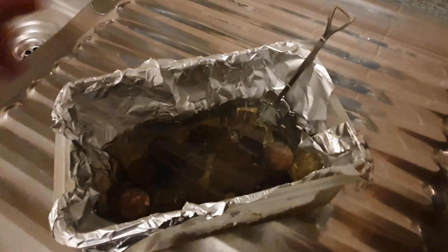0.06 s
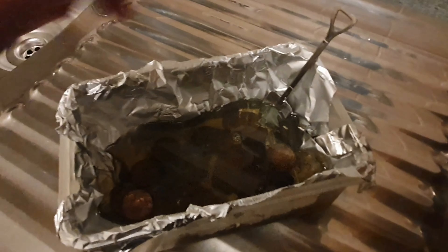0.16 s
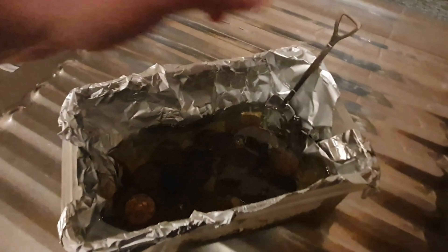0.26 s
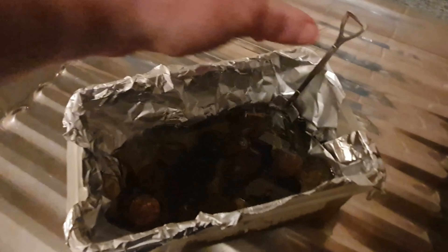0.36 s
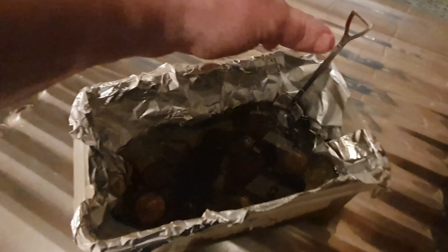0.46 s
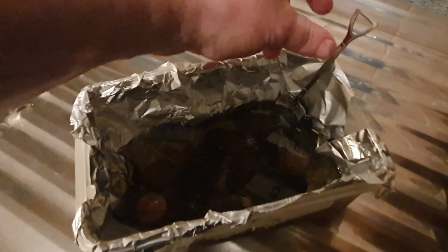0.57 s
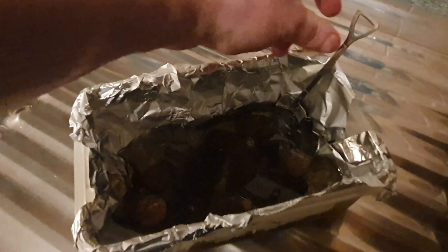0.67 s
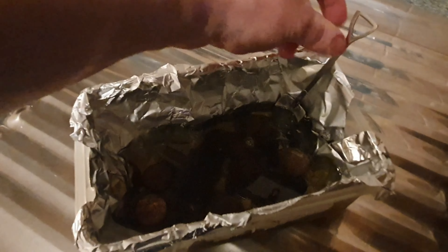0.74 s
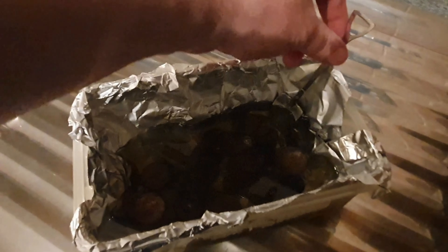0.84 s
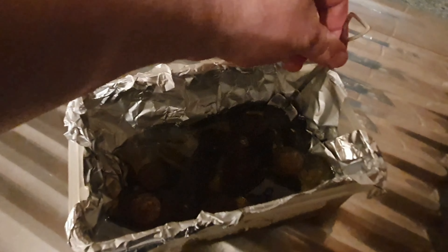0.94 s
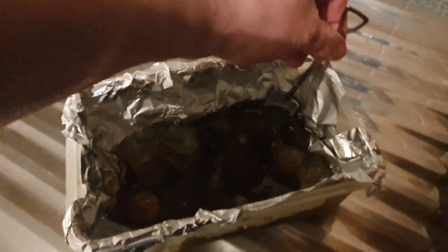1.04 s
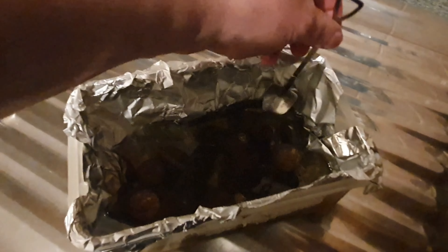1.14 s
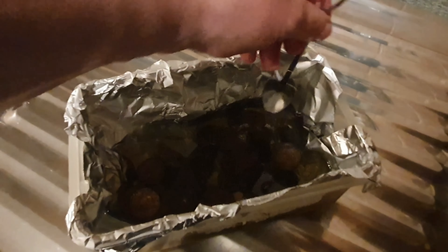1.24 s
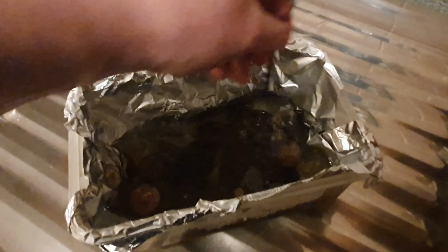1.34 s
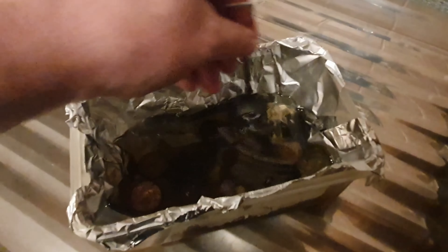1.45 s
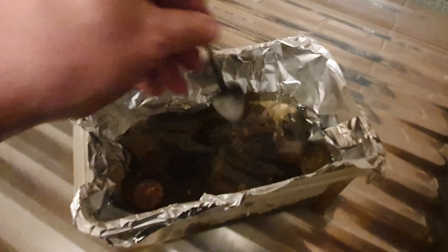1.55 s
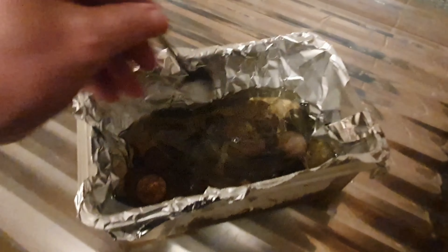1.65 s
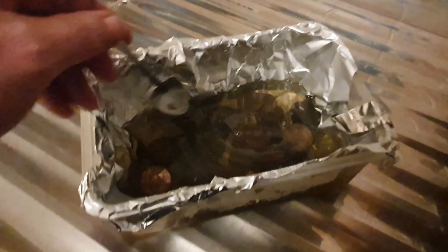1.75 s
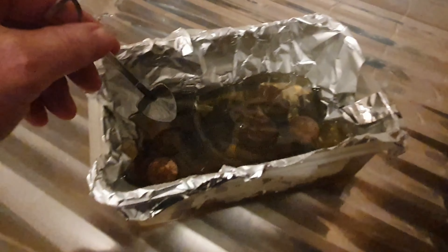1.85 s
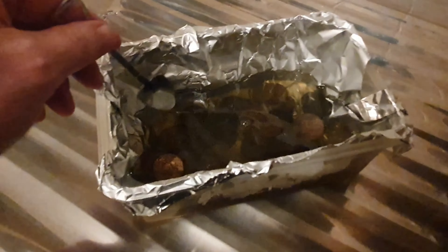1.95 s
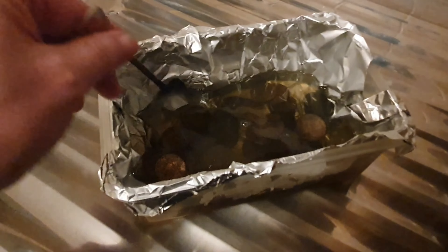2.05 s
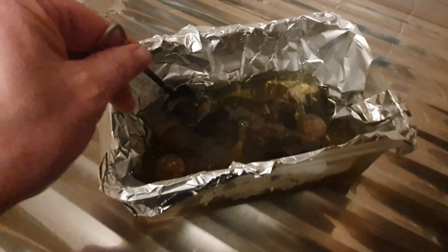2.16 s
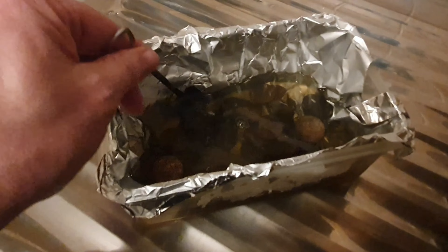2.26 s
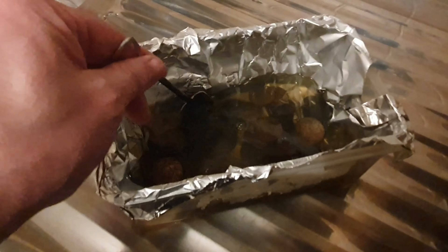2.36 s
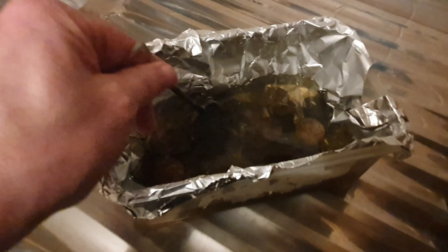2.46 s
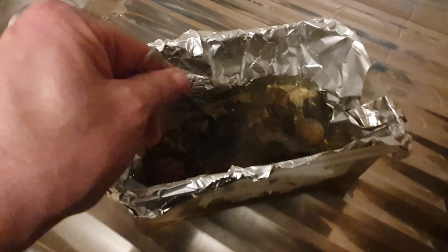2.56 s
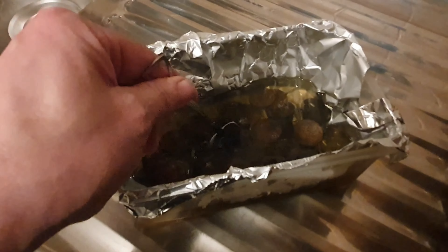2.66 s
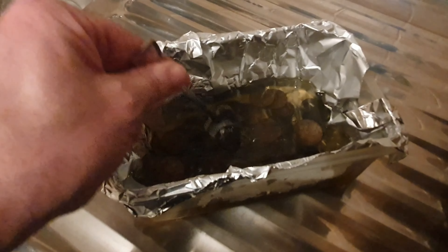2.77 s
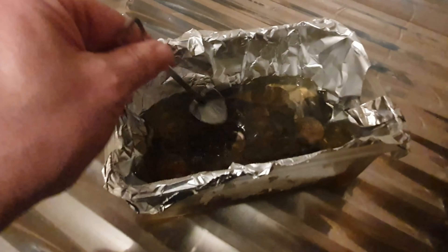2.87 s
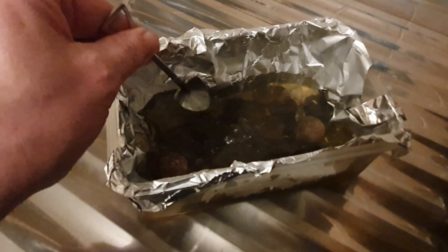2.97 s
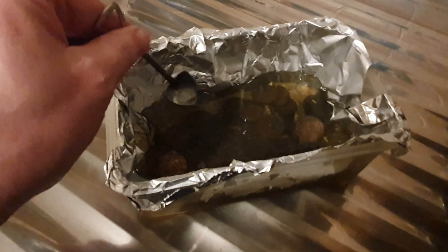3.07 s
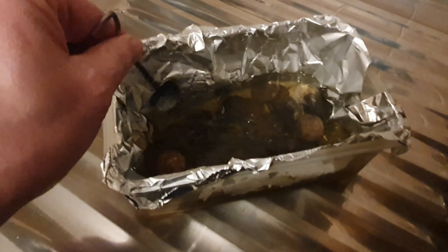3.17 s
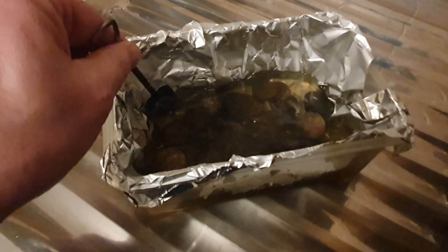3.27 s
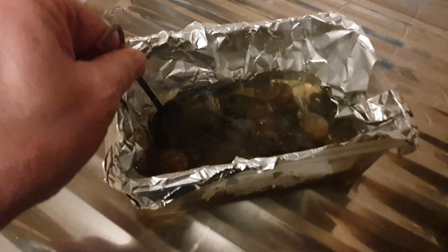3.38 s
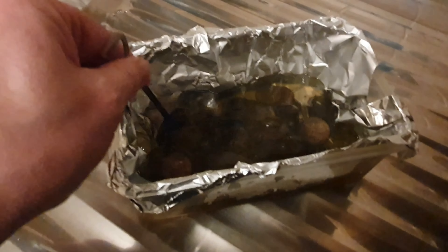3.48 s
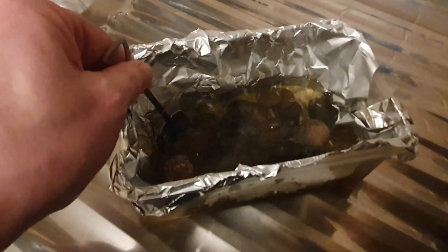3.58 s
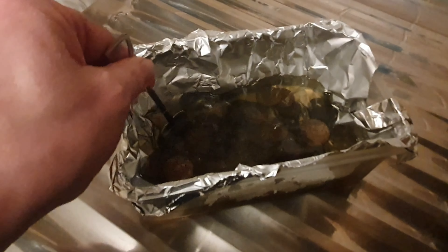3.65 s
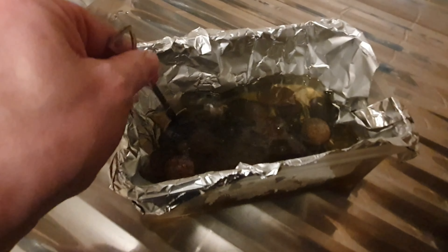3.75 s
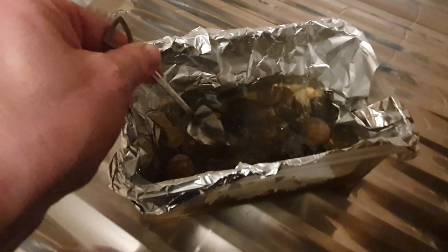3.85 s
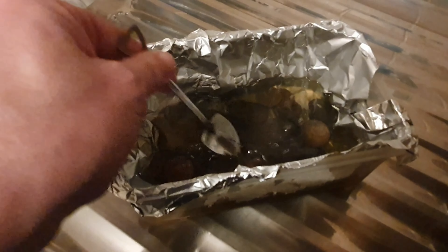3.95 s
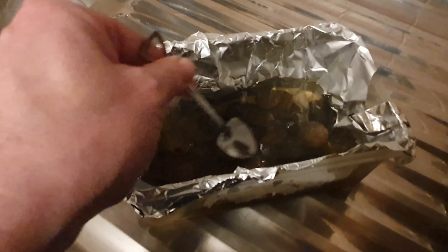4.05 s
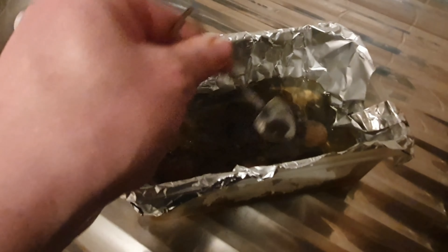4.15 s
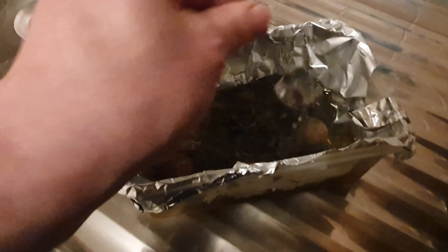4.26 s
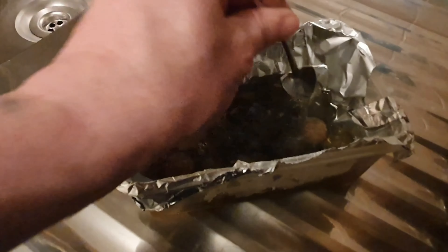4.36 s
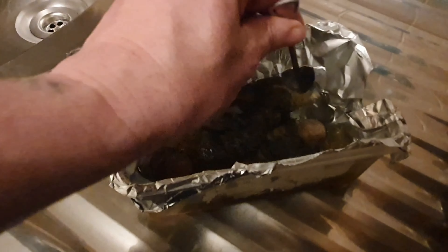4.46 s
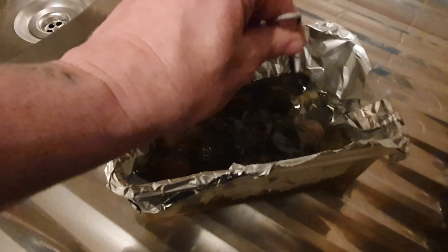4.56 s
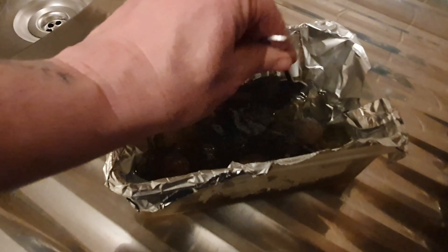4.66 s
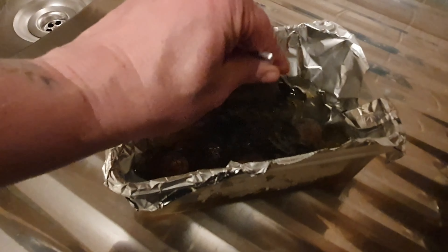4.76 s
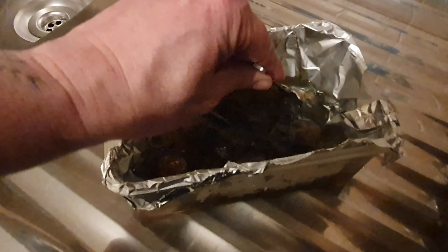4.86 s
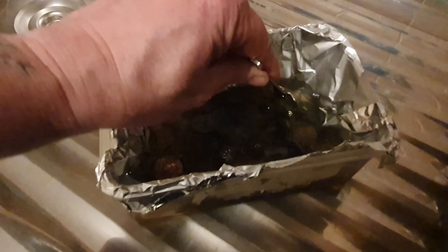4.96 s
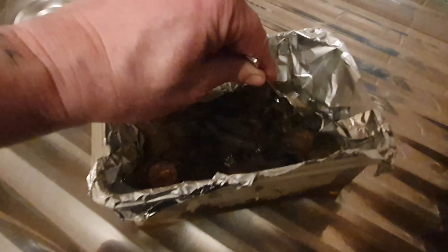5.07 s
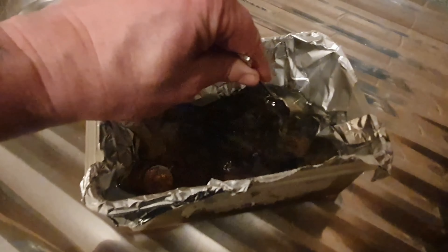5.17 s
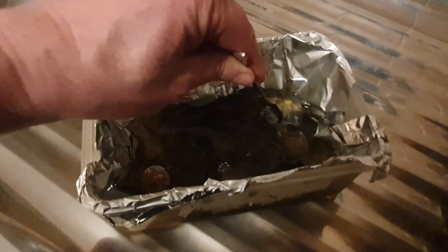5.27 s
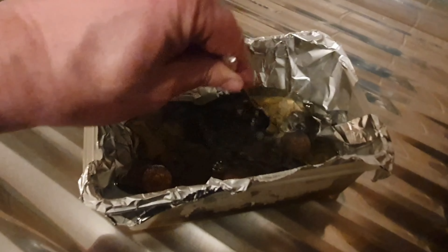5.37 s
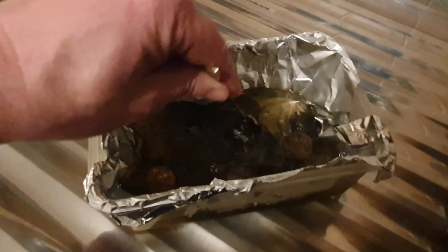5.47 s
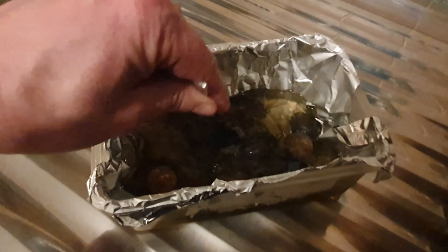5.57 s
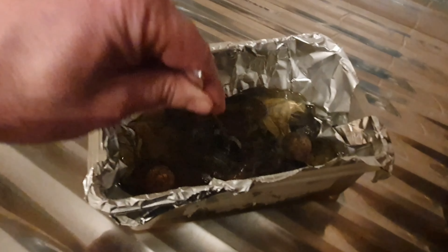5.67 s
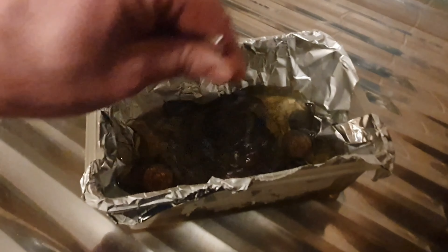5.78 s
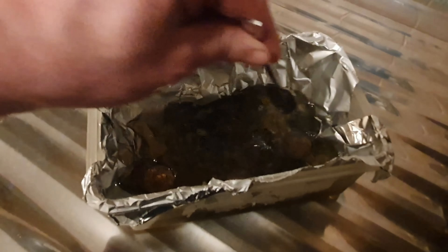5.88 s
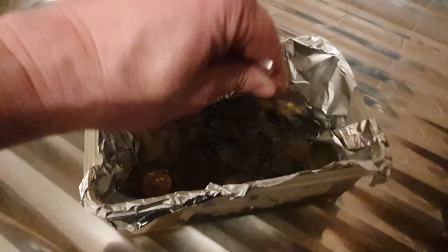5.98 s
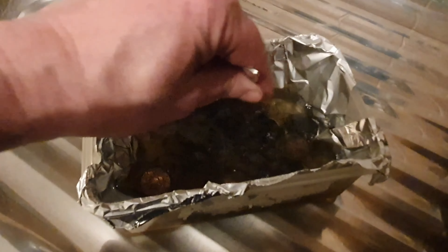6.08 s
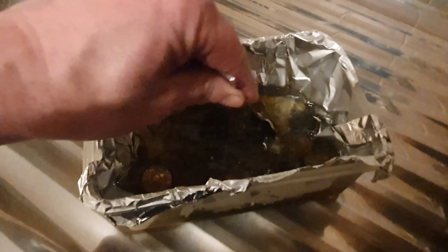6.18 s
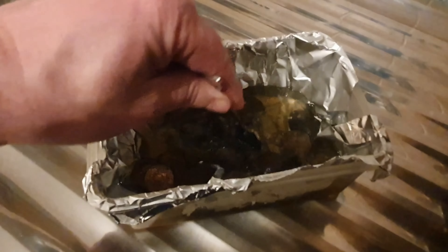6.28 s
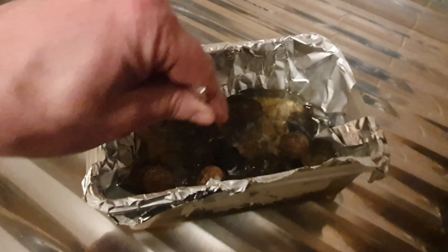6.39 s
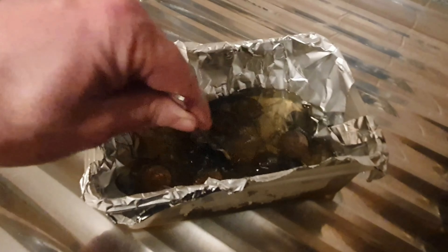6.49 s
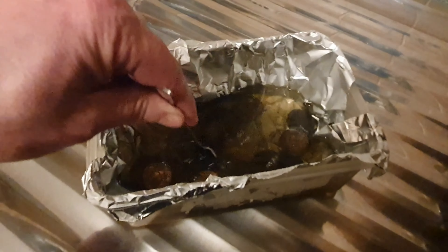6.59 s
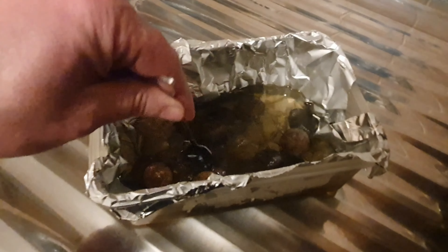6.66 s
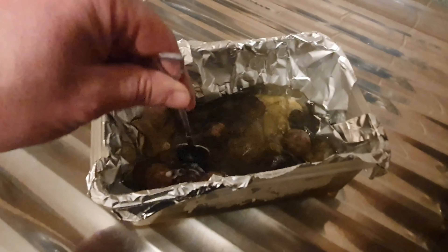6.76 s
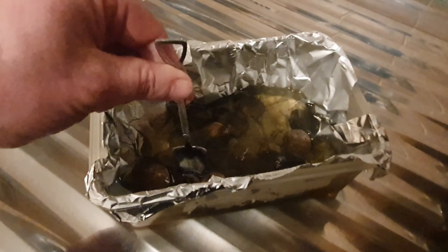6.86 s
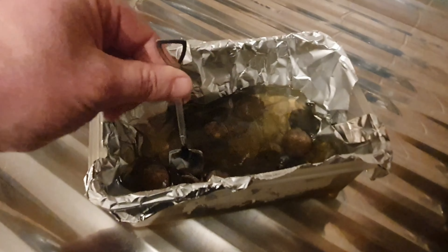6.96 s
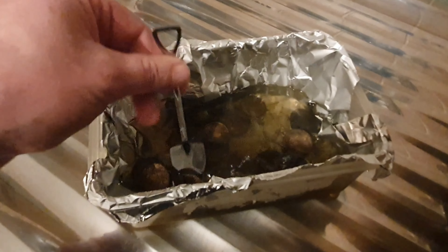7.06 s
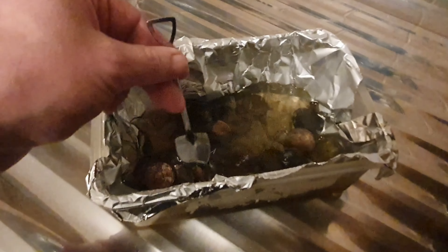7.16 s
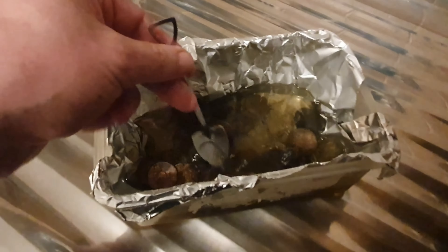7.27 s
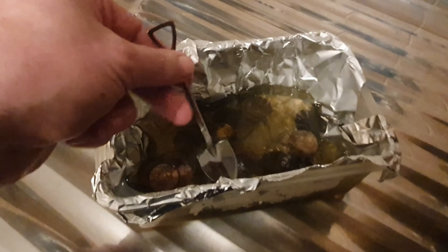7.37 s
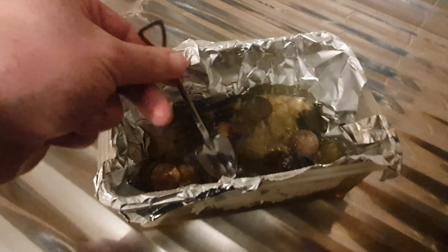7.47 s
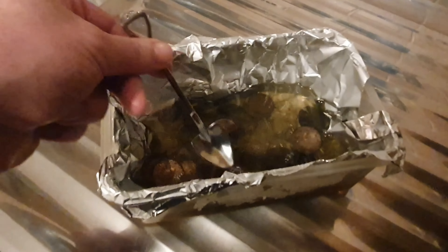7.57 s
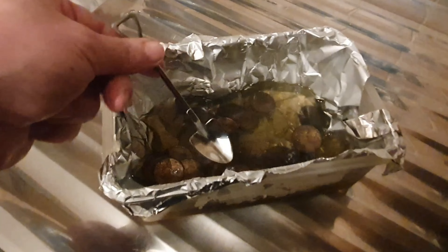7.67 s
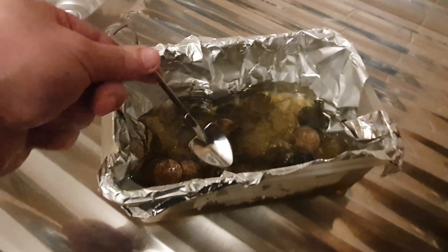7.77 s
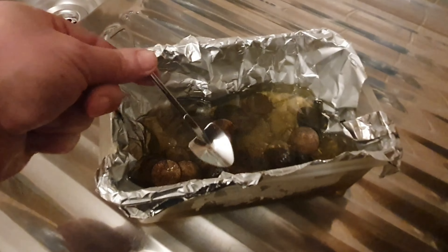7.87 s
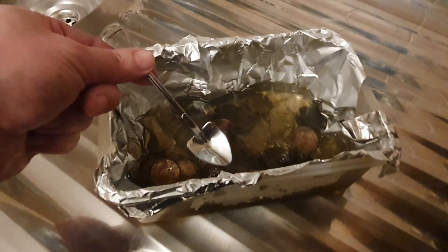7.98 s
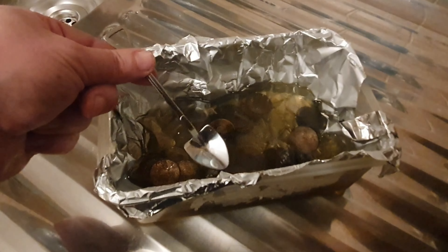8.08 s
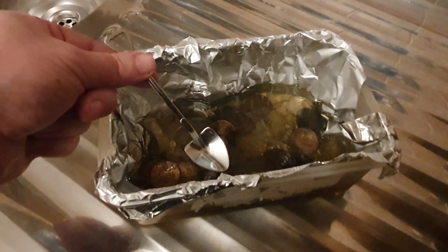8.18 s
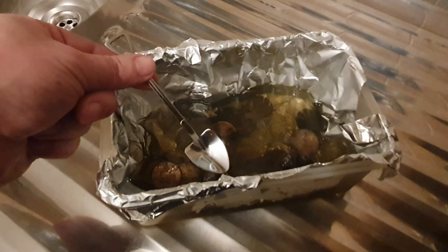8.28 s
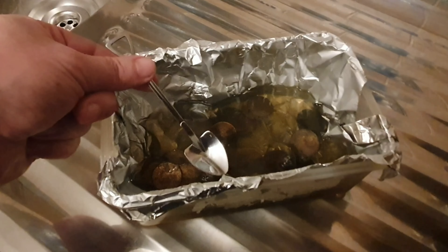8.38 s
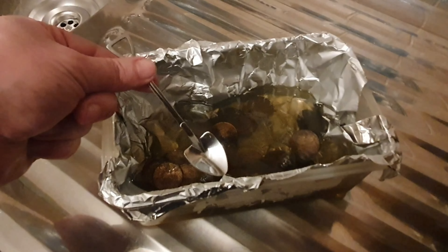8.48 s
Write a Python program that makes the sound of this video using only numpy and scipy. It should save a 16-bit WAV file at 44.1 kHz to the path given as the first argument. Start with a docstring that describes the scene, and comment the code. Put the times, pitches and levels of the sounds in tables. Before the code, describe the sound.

Bright irregular coin clinks and crinkly foil scrapes from a little spoon, with dull low thuds of a metal sink top, growing busier then stopping.

```python
"""A small metal spoon scrapes coins over the foil lining of a tray: dense random slips rustle and ring it.
Coins clink as bursts of noise with a ring and a rattle, and the hollow tray knocks in short fading notes.
The steel draining board under the tray booms and drums: pushed noise through a few low notes of its own.
A small kitchen echoes briefly; behind it lie a low house rumble with faint hiss, and a hum that comes twice."""
import sys
import numpy as np
from scipy import signal
from scipy.fft import rfft, irfft, next_fast_len
from scipy.io import wavfile
from scipy.ndimage import uniform_filter1d

SR = 44100
rng = np.random.default_rng(int(sys.argv[2]) if len(sys.argv) > 2 else 0)


def master(y):
    """Save y as 16-bit WAV."""
    cut = np.clip(np.atleast_2d(y).T, -1, 1)
    pcm = np.round(cut * 32767)  # scale
    wavfile.write(sys.argv[1], SR, pcm.astype(np.int16))


N = 376111  # samples
CONTROL_STEP = 32  # samples between the points of a slow control
LEFT_LAG = -6  # samples; the tray is nearer the left port
TOP_HZ = 16500


def undb(db):
    """Decibels to gain."""
    return 10 ** (np.asarray(db) / 20)


def unit(x):
    """Scale to an rms level of 1."""
    return x / np.sqrt(np.mean(x ** 2))


def colour(x, points):
    """Make each pitch range louder or softer, following (Hz, dB) points."""
    size = next_fast_len(N)
    hz, db = np.transpose(points)
    bins = np.arange(size // 2 + 1) * SR / size + 1
    gain = undb(np.interp(np.log(bins), np.log(hz), db))
    return irfft(rfft(x, size) * gain, size)[..., :N]


def band(x, lo_hz, hi_hz):
    """Keep the pitches between two limits."""
    return signal.sosfilt(signal.butter(2, [lo_hz, hi_hz], "band", fs=SR, output="sos"), x)


def split(x, lo_hz, hi_hz):
    """Low, middle and high part that add up to the whole."""
    low = colour(x, [(lo_hz / 1.3, 0), (lo_hz, -6), (lo_hz * 1.6, -40)])
    high = colour(x, [(hi_hz / 1.6, -40), (hi_hz, -6), (hi_hz * 1.3, 0)])
    return low, x - low - high, high


def ring(x, hz, width):
    """One mode, a note that dies away after a tap; a wider mode (Hz) dies sooner, a unit tap gives level 1."""
    r, w = np.exp(-np.pi * width / SR), 2 * np.pi * hz / SR
    return signal.lfilter([0, np.sin(w)], [1, -2 * r * np.cos(w), r * r], x)


def modes(x, table):
    """Several modes driven by the same sound, at their levels relative to each other."""
    return unit(sum(undb(db) * width * ring(x, hz, width) for hz, width, db in table))


def curves(rows, off_db=-120):
    """Columns of a table at every sample; the first column of values is silent outside it."""
    s, first, *rest = np.transpose(rows)
    t = np.arange(N) / SR
    return [np.interp(t, s, first, off_db, off_db)] + [np.interp(t, s, c) for c in rest]


def slips(rate, scatter_db, channels=1):
    """Random stick-slip taps, so many a second, a few far larger than most."""
    count = int(rate * N / SR)
    out = np.zeros((channels, N))
    luck = np.minimum(rng.exponential(size=(channels, count)), 3.2)
    size = undb(scatter_db * luck) * rng.choice([-1, 1], (channels, count))
    np.put_along_axis(out, rng.integers(0, N, (channels, count)), size, axis=1)
    return unit(out)


def walk(rate):
    """Slow random wander with a spread of 1; a higher rate wanders faster."""
    k = int(SR / rate)
    return unit(uniform_filter1d(uniform_filter1d(rng.standard_normal(N), k), k))


def pair(x, pan_db, lag=LEFT_LAG):
    """Two microphone ports: the left is shifted by the lag; a positive pan makes it louder than the right."""
    return np.array([np.roll(x, lag) * undb(pan_db / 2), x * undb(-pan_db / 2)])


def ports(shared, left, right, alike):
    """Both ports share part of the creases and hear others alone."""
    return alike * pair(shared, -1.0) + np.sqrt(1 - min(alike, 1) ** 2) * np.array([left, right])


def smooth(coarse):
    """Stretch a coarse control to every sample."""
    return np.interp(np.arange(N), CONTROL_STEP * np.arange(len(coarse)), coarse)


# Tone of the house noise. Each row: pitch in Hz, level per Hz in dB relative to the other rows.
HOUSE_TONE = [(18, -30.5), (30, -8), (55, -2.5), (74, -6), (107, 1.5), (125, -20), (190, -22.5),
              (332, -28.5), (659, -32), (858, -34), (1150, -39), (1420, -37.5), (16500, -52)]


def house(level_db=-66):
    """Low rumble, alike at both ports, and faint unrelated hiss above; the right port is 3 dB louder."""
    mid, side = colour(rng.standard_normal((2, N)), HOUSE_TONE)
    # the difference between the ports is weaker at low pitches
    side = colour(side, [(50, -7), (300, -1.0), (1500, 0.0)]) * np.array([[1], [-1]])
    return unit(mid + side) * undb(level_db + np.array([[-1.5], [1.5]]))


# The low hum, two stretches of rows. Each row: time in seconds, pitch in Hz, level in dB.
HUM_STRETCHES = [
    [(3.8, 66.2, -62), (4.026, 66.4, -38.5), (4.21, 66.5, -38.5), (4.28, 66.8, -59)],
    [(4.45, 64.3, -56), (4.53, 61, -60), (4.652, 60, -50), (4.75, 63.9, -70.5)],
]


def hum():
    """A low hum: a near-sine whose pitch and level drift, nearly alike at both ports."""
    out = 0
    t = np.arange(N) / SR
    for rows in HUM_STRETCHES:
        s, hz, db = np.transpose(rows)
        fade = np.clip(np.minimum(t - s[0], s[-1] - t) / .03, 0, 1)
        turns = np.cumsum(np.interp(t, s, hz)) / SR
        tone = np.sqrt(2) * np.sin(2 * np.pi * turns)
        out = out + fade * undb(np.interp(t, s, db)) * tone
    return pair(out, -2.5)


# How long the kitchen rings. Each row: centre pitch of a band in Hz, time to die by 60 dB in seconds.
ECHO_BANDS = [(250, 0.14), (1000, 0.48), (4000, 0.38), (11000, 0.093)]


def kitchen(dry, wet_db=-12, first_ms=4):
    """Diffuse echo of the walls: noise, other for each port, that dies away band by band."""
    t = np.arange(SR // 2) / SR
    echo = 0
    for hz, t60 in ECHO_BANDS:
        noise = band(rng.standard_normal((2, len(t))), hz / 2, min(hz * 2, 19000))
        echo = echo + noise * undb(-60 * t / t60)
    echo = echo * (t * 1000 > first_ms)
    echo = echo / np.sqrt(np.sum(echo ** 2) / 2)
    return undb(wet_db) * signal.fftconvolve(dry.mean(axis=0)[None], echo, axes=1)[:, :N]


# The pushes of the spoon. Each row: start in seconds, length in seconds, scrape level in dB at the start,
# the same at the end, favoured ring in Hz, tray body in dB relative to the scrape, foil crackle in dB
# relative to the scrape, boom of the board in dB, drumming of the board in dB.
SPOON_PUSHES = [(.905, .02, -66, -67, 2300, -12, -14, -64, -84),
                (1.0, .05, -71, -53.5, 2314, -8, -10.5, -55.5, -68),
                (1.08, 0.095, -59, -47, 2900, -16.5, 0, -65, -69),
                (1.519, 0.036, -47.5, -41.5, 4000, -11.5, -9.5, -55, -58.5),
                (2.293, .07, -47, -53, 2750, -5, -13, -51, -51),
                (2.415, 0.088, -49.5, -42.5, 2104, -4.5, -17, -47, -55),
                (2.557, .13, -40, -36.5, 2425, -7.5, -21, -43.5, -49.5),
                (2.7, 0.12, -45.5, -48, 2800, -4.5, -12, -47, -50),
                (2.86, 0.15, -57.5, -61.5, 3970, -7.5, -15.5, -67, -79),
                (3.01, 0.061, -43, -48, 3700, 0.5, -13, -45.5, -48.5),
                (3.368, .015, -50, -44, 2403, -16, -17.5, -52.5, -57),
                (3.45, .08, -55.5, -45.5, 5416, -3.5, -6.5, -55.5, -54),
                (3.59, 0.056, -48, -40.5, 2830, -7.5, -8, -58, -45),
                (3.72, 0.27, -62.5, -60, 2500, -2.5, -10.5, -60.5, -65),
                (3.982, 0.14, -36.5, -38, 3200, -6.5, -10, -50, -45),
                (4.762, 0.14, -50.5, -53.5, 3270, -3.5, -9.5, -41.5, -54),
                (4.93, 0.16, -65.5, -61, 2542, -5.5, -6, -48, -62.5),
                (5.09, 0.12, -60.5, -68.5, 4700, -6, -4.5, -54, -61),
                (5.21, 0.13, -69, -73, 4000, -3.5, -1.5, -53.5, -63.5),
                (5.353, .05, -63.5, -60, 3100, 1, -7, -48, -46),
                (5.4, .12, -38.5, -38.5, 3403, -7.5, -14, -38, -46),
                (5.54, 0.088, -41, -45.5, 2455, -6.5, -18, -42, -50),
                (5.66, .15, -40, -39.5, 3793, -4.5, -8.5, -35, -41),
                (5.83, .04, -49, -51, 3010, -2.5, -33, -42, -47),
                (6.17, .03, -65.5, -65.5, 1807, 1, -8, -47.5, -57.5),
                (6.25, 0.024, -61.5, -53.5, 2626, 0, -11, -49.5, -51.5),
                (6.269, .025, -41, -47.5, 4400, -3, 3, -36.5, -43),
                (6.33, .07, -55.5, -49.5, 4550, -3.5, -2, -53, -58),
                (6.406, 0.08, -32.5, -37, 4630, -6, -8, -40, -40.5),
                (6.523, 0.086, -33.5, -35, 3075, -4.5, -13.5, -31, -41.5),
                (6.686, 0.085, -36, -39.5, 3600, -0.5, -9.5, -34, -35.5),
                (6.82, .12, -48.5, -54.5, 3235, -6, -17, -46.5, -61),
                (7.009, .15, -53, -47, 3800, -7.5, -11, -48, -58),
                (7.196, .03, -34.5, -49, 2770, -4.5, -3.5, -49, -51.5),
                (7.26, .06, -58.5, -58, 2734, -4, -5.5, -69, -66),
                (7.328, 0.086, -50.5, -44, 4520, -8, -4, -48, -47),
                (8.07, 0.028, -81.5, -76, 3200, -15.5, -4, -67, -82)]


def pushes(first_db, last_db, attack_s, fall_db_s):
    """Power of each push over time: quick rise, straight swell or sag, steady fall."""
    start, length = np.transpose(SPOON_PUSHES)[:2, :, None]
    age = np.arange(0, N + CONTROL_STEP, CONTROL_STEP) / SR - start
    held = first_db[:, None] + (last_db - first_db)[:, None] * np.clip(age / length, 0, 1)
    rise = np.clip(age / attack_s, 0, 1)
    fall_db = fall_db_s * np.maximum(age - length, 0)
    return (rise * undb(held - fall_db)) ** 2 + 1e-30


def sheet(push, hz, width, even):
    """One deep mode of the board; its chance swells are partly evened out."""
    tone = unit(ring(ring(push, hz, 3 * width), hz, width))
    power = uniform_filter1d(np.mean(tone ** 2, axis=0), SR // 12)
    return unit(tone / (power + .01) ** (even / 2))


# Deep notes of the board; the first follows the pushes. Each row: pitch in Hz, width in Hz.
BOOM_MODES = [(91.77, 11), (47.4, 2), (73.5, 12)]
# Levels of the other two deep notes. Each row: time in seconds, lower note in dB, upper note in dB.
DEEP_LEVELS = [(0.0, -74.5, -78), (1.11, -66, -71.5), (2.2, -72, -76), (2.35, -44, -51.5),
               (2.49, -55.5, -51), (2.75, -39.5, -40.5), (2.96, -54.5, -70.5), (3.49, -73, -61),
               (3.56, -42.5, -41.5), (3.75, -69, -57.5), (4.15, -46, -52), (4.32, -61, -65.5),
               (4.74, -62.5, -68), (4.86, -46, -50), (5.22, -64.5, -62), (5.5, -45, -45), (5.62, -60, -52),
               (5.74, -49, -38), (6.07, -72.5, -78.5), (6.29, -49, -42), (6.62, -37, -40), (6.69, -51, -40),
               (6.95, -62, -64), (7.45, -56, -55), (7.55, -74, -76.5), (8.35, -67.5, -70),
               (8.52, -60, -51.5)]
# Drumming notes of the board. Each row: pitch in Hz, width in Hz, level in dB relative to the other rows.
DRUM_MODES = [(185, 46, -3.5), (227.5, 11, -0.5), (269.3, 16, 0.5), (375.2, 10, -4.5)]


def board(even=0.57, side=0.099, right_db=3.0, attack_s=.02, fall_db_s=260,
          idle_boom_db=-71.5, idle_drum_db=-88.5, idle_wander_db=4.5):
    """The steel sheet under the tray booms and drums as the load on it shifts, and always hums a little."""
    boom_db, drum_db = np.transpose(SPOON_PUSHES)[7:]
    boom_gain = smooth(np.sqrt(pushes(boom_db, boom_db, attack_s, fall_db_s).sum(axis=0)))
    drum_gain = smooth(np.sqrt(pushes(drum_db, drum_db, attack_s, fall_db_s).sum(axis=0)))
    idle = undb(idle_wander_db * walk(12))
    gains = [boom_gain + undb(idle_boom_db) * idle, *undb(curves(DEEP_LEVELS))]
    # slips alike at both ports, plus a little noise that is opposite in the two
    mid, other = slips(300, 3.5)[0], rng.standard_normal(N)
    push = band(mid + side * other * np.array([[1], [-1]]), 44, 500)
    boom = sum(gain * sheet(push, hz, width, even) for gain, (hz, width) in zip(gains, BOOM_MODES))
    boom = boom * undb([[-right_db / 2], [right_db / 2]])
    drum = unit(band(modes(push, DRUM_MODES), 150, 430))
    return boom + (drum_gain + undb(idle_drum_db) * idle) * drum


# Hollow knocks of the tray. Each row: time in seconds, level in dB before the soft start and roughness,
# pitch in Hz, time to die by 60 dB in seconds.
TRAY_KNOCKS = [(1.043, -37, 1466, 0.05), (2.302, -38.5, 293, 0.05), (2.8, -23.5, 994, 0.05),
               (3.012, -34.5, 920, 0.05), (3.505, -39.5, 286, 0.14), (3.618, -33.5, 275, 0.12),
               (5.354, -36.5, 189, 0.071), (7.199, -41, 248.6, 0.05)]


def knocks(push_ms=1.0, rough=0.24):
    """Blunt pushes on the hollow tray, one note each that starts softly and soon dies."""
    out, t = np.zeros(N), np.arange(N) / SR
    for s, db, hz, t60 in TRAY_KNOCKS:
        age = np.clip(t - s, 0, 1)
        soft_start = 1 - np.exp(-age * 1000 / push_ms)
        out += undb(db - 60 * age / t60) * soft_start * np.sin(2 * np.pi * hz * age)
    return pair(out * (1 + rough * walk(260)), 0.)


# The clinks. Each row: time in seconds, level of the bright crack in dB, ring of the coin in Hz,
# dull part in dB relative to the crack.
COIN_CLINKS = [(0.9083, -61, 2250, 4), (1.044, -42, 3500, -4), (1.0866, -43, 8980, -12),
               (1.1404, -33, 4070, -6), (1.5209, -34, 8140, -3), (1.549, -30.5, 6400, -7),
               (2.2936, -32.5, 8150, -0.5), (2.347, -37, 4180, -6), (2.43, -41.5, 4300, 15.5),
               (2.487, -29.5, 4430, 3.5), (2.51, -36, 4470, -1), (2.5595, -39, 4550, 11),
               (2.576, -25.5, 4610, 2), (2.592, -27.5, 9200, 4), (2.6217, -29, 4440, -13.5),
               (2.651, -45, 4300, 7.5), (2.7078, -24, 4280, -8), (2.8014, -30, 4600, 3),
               (2.9782, -41.5, 6700, -11), (3.011, -41, 4380, -2), (3.025, -39, 4600, -17),
               (3.046, -31.5, 4430, -7), (3.3708, -37.5, 4900, 6), (3.454, -34, 4840, -4.5),
               (3.492, -20.5, 6180, -29.5), (3.4972, -30, 6000, -23.5), (3.5277, -40, 4900, -1),
               (3.596, -33, 4840, -9), (3.7459, -45.5, 4170, -7.5), (3.9945, -18.5, 10650, -9.5),
               (4.0055, -18, 6520, -11), (4.0149, -15, 4450, -16.5), (4.048, -29, 4310, -17),
               (4.068, -19, 4630, -6), (4.1181, -38, 4420, 8.5), (4.7626, -20, 6320, -10),
               (4.802, -36.5, 4260, 2), (4.8913, -42.5, 4400, 7), (5.1, -33, 8950, -13),
               (5.1413, -27, 5600, -19), (5.1901, -31, 5800, -31), (5.3646, -44, 4470, -5.5),
               (5.3924, -36.5, 4740, 0), (5.4142, -15.5, 4280, -5.5), (5.4562, -27.5, 4600, -6),
               (5.4852, -14, 6700, -13), (5.5648, -28.5, 4440, -8.5), (5.6173, -34, 4500, 2),
               (5.6417, -19.5, 6950, -15), (5.672, -32, 6700, -10), (5.685, -15.5, 6370, -9),
               (5.7479, -12, 6660, -24), (5.805, -38, 5650, -19), (5.8174, -35, 5570, -6),
               (5.8601, -36.5, 4370, -4), (6.271, -12, 9350, -30.5), (6.3754, -21, 4630, -21.5),
               (6.4198, -5.5, 10460, -28), (6.437, -22, 9700, -12), (6.4723, -30, 4680, -14.5),
               (6.527, -15.5, 4970, -33), (6.557, -19.5, 4560, -23.5), (6.6033, -22.5, 9300, -12.5),
               (6.65, -31, 4400, -5), (6.69, -15.5, 7900, -35), (6.713, -16, 5320, -25),
               (6.7388, -26, 4380, -13.5), (6.8895, -36, 4470, -21), (6.9276, -37, 6950, -25),
               (7.0108, -27, 4400, -38), (7.034, -34, 4450, -20), (7.1296, -35, 6740, -2),
               (7.1963, -34, 9700, -13), (7.2958, -41, 6370, -15), (7.3315, -39, 4200, -6.5),
               (7.3733, -33.5, 4450, -29), (7.412, -25.5, 4800, -35), (7.68, -66.5, 6000, -24),
               (7.96, -70, 6000, -25)]
# Modes of spoon, coins and tray. Each row: pitch in Hz, width in Hz, level in dB relative to the other rows.
TRAY_MODES = [(962, 55, -2), (1617, 180, -7), (1930, 170, -6), (2340, 150, -6.5), (2874, 250, -1.5),
              (3850, 150, -11.5), (4496, 390, -2.5), (6090, 1200, -4), (6800, 100, -5), (7860, 150, -6.5),
              (9700, 1300, 0), (10760, 50, -2.5), (13600, 2700, -14)]


def clinks(crack_ms=1.0, rattle_ms=14, rattle_db=-14, own_db=-3.5, own_q=35, tray_db=6, lag_spread=2.5,
           pan_db=0.0):
    """A blow is a crack and a short rattle of foil through the tray's modes, plus the struck coin's ring."""
    size = 4096  # samples kept of each blow
    out = np.zeros((2, N + size))
    t = np.arange(size) / SR
    noise = rng.standard_normal((len(COIN_CLINKS), 3, size))
    luck = rng.standard_normal((len(COIN_CLINKS), len(TRAY_MODES) + 1))
    for (s, db, hz, dull_db), (hiss, *foil), (place, *gains) in zip(COIN_CLINKS, noise, luck):
        # every blow lands at a slightly different place
        lag = int(LEFT_LAG + lag_spread * place)
        crack = pair(hiss * np.exp(-t * 1000 / crack_ms), pan_db - 2 * place, lag)
        rattle = undb(rattle_db) * np.array(foil) * np.exp(-t * 1000 / rattle_ms)
        force = crack + rattle
        # chance shifts each mode by about 1 dB
        tray = sum(undb(d + g) * w / f * ring(force, f, w) for g, (f, w, d) in zip(gains, TRAY_MODES))
        blow = force + undb(tray_db) * tray
        coin = ring(crack, hz, hz / own_q)
        dull, bright = band(blow, 1500, 4000), band(blow, 4000, 17000)
        bright = bright / abs(bright).max() + undb(own_db) * coin / abs(coin).max()
        dull = undb(dull_db) * dull / abs(dull).max()
        i = int(s * SR)
        out[:, i:i + size] += undb(db) * (bright + dull)
    return out[:, :N]


# Tone of the foil's rustle. Each row: pitch in Hz, level per Hz in dB relative to the other rows.
RUSTLE_TONE = [(180, -35), (300, -7.5), (987, -10.5), (1210, -15), (2840, -7.5), (3530, -7.5),
               (6240, -19.5), (15200, -14.5), (16500, -28)]


def scrape(favour_db=10, reach=0.16, wander_db=6.5, judder_db=3.0, alike=0.32, attack_s=0.0027,
           fall_db_s=449):
    """Slips over crumpled foil rustle and ring the modes, most the one that the spoon's place favours."""
    first_db, last_db, ring_hz, body_db, foil_db = np.transpose(SPOON_PUSHES)[2:7]
    # a push bites at once and lets go more slowly
    power = pushes(first_db, last_db, attack_s, fall_db_s)
    place_hz = smooth(ring_hz @ power / power.sum(axis=0))  # the loudest push sets the place
    rub_gain = smooth(np.sqrt(power.sum(axis=0)))
    body_gain = smooth(np.sqrt(undb(2 * body_db) @ power))
    foil_gain = smooth(np.sqrt(undb(2 * foil_db) @ power))

    drive = undb(judder_db * walk(84)) * ports(*slips(6000, 3.1, channels=3), alike)
    ticks = ports(*slips(220, 4.0, channels=3), alike)
    rings = 0
    for k, (hz, width, db) in enumerate(TRAY_MODES):
        favour = favour_db * np.exp(-(np.log(hz / place_hz) / reach) ** 2)
        # every mode is struck at its own moments, the wide, dull ones less
        own_ticks = np.roll(ticks, 9973 * k, axis=1) * min(400 / width, 1)
        gain = undb(db + favour + wander_db * walk(20))
        rings = rings + width * ring(gain * (drive + 3.5 * own_ticks), hz, width)

    rustle = unit(colour(drive, RUSTLE_TONE))
    body, rub, foil = (unit(part) for part in split(rustle + 1.9 * unit(rings), 1300, 6000))
    # a favoured ring takes energy from the others
    rub = rub / np.sqrt(uniform_filter1d(np.mean(rub ** 2, axis=0), SR // 8))
    body = body.mean(axis=0) * 0.5 + 0.77 * body  # long waves reach both ports more alike
    return rub_gain * rub + body_gain * body + foil_gain * foil


def scene():
    """Spoon work in the kitchen over the board, the hum and the house."""
    background = house() + hum()
    hollow = knocks()
    near = scrape() + clinks()
    return background + kitchen(near + .2 * hollow) + board() + hollow + near


def record(dry):
    """The ports differ a little in the treble; the recorder cuts the top."""
    left_db = [(2000, 0), (4500, -1.0), (9000, -1.2), (13000, 0.0)]  # (Hz, dB)
    right_db = [(hz, -db) for hz, db in left_db]
    dry = np.array([colour(dry[0], left_db), colour(dry[1], right_db)])
    return signal.sosfilt(signal.ellip(10, .2, 80, TOP_HZ, fs=SR, output="sos"), dry)


dry = scene()
out = record(dry)
master(out)
```